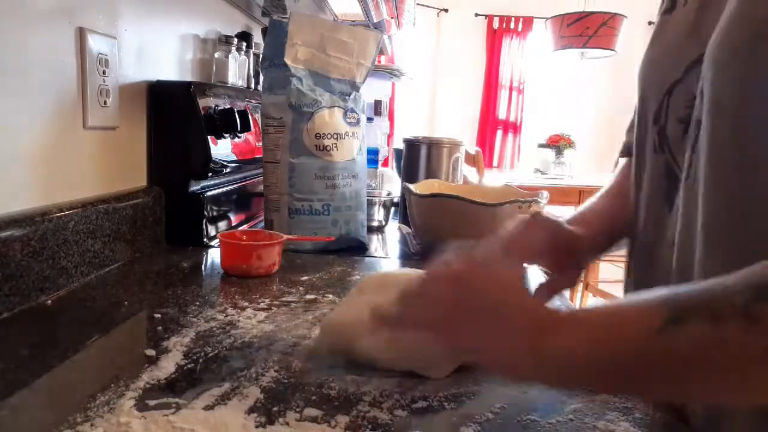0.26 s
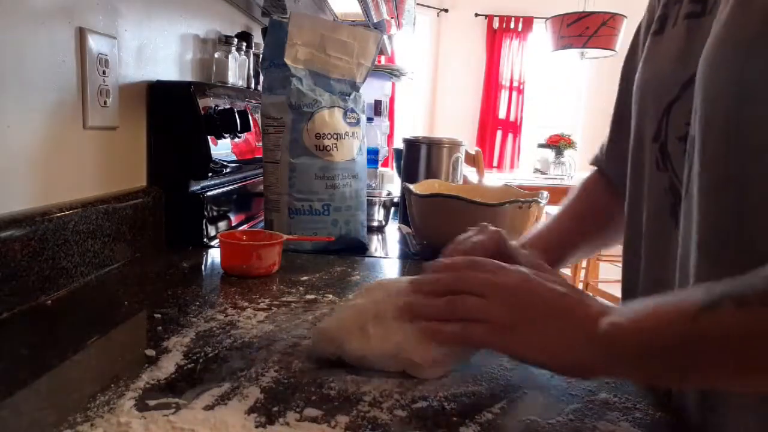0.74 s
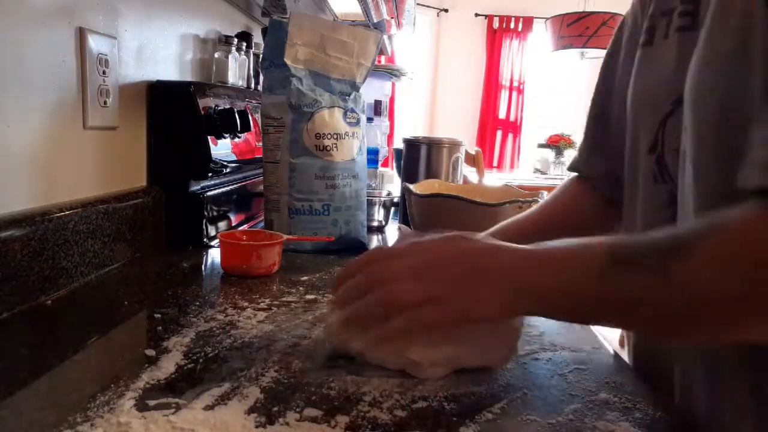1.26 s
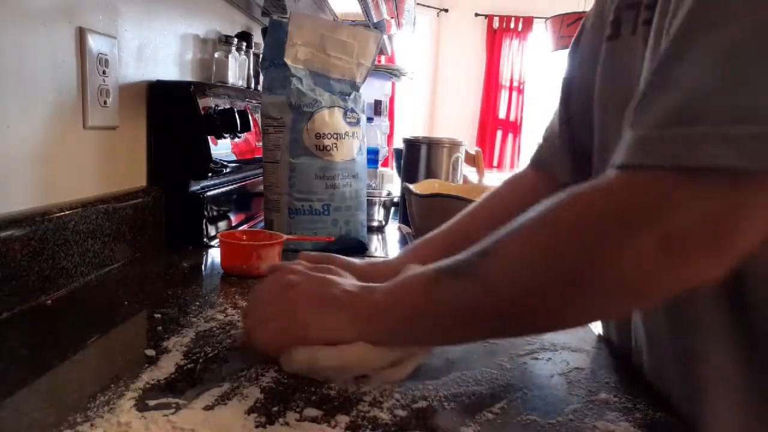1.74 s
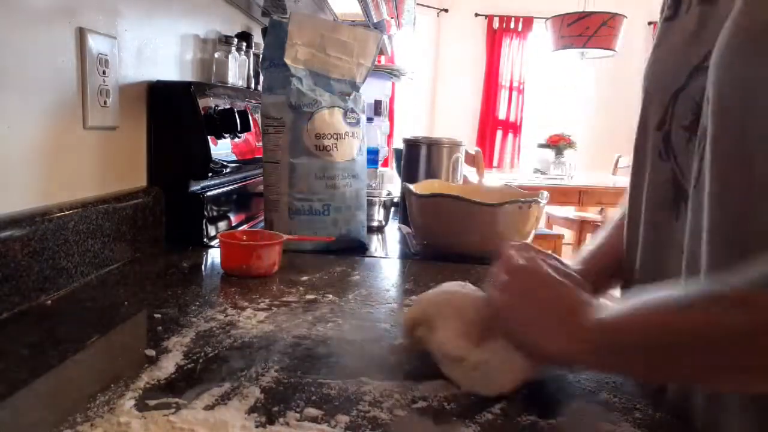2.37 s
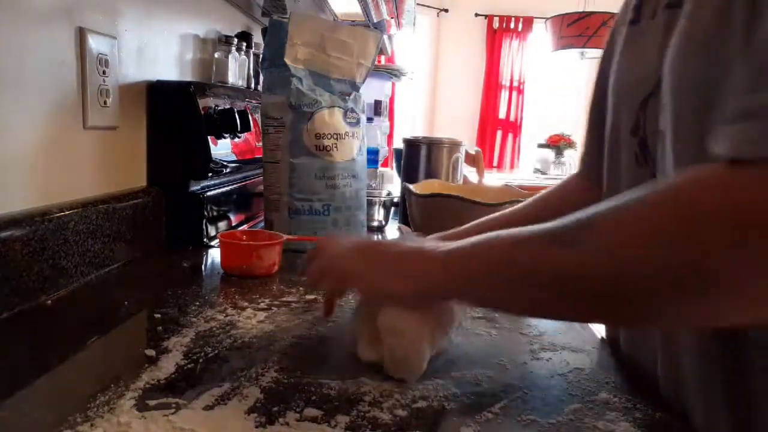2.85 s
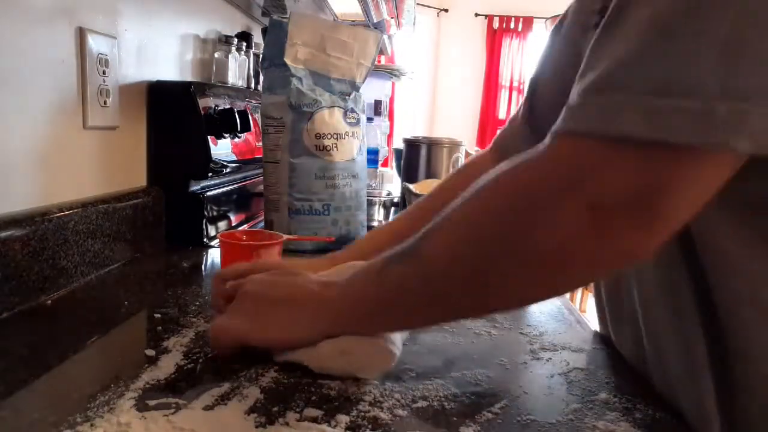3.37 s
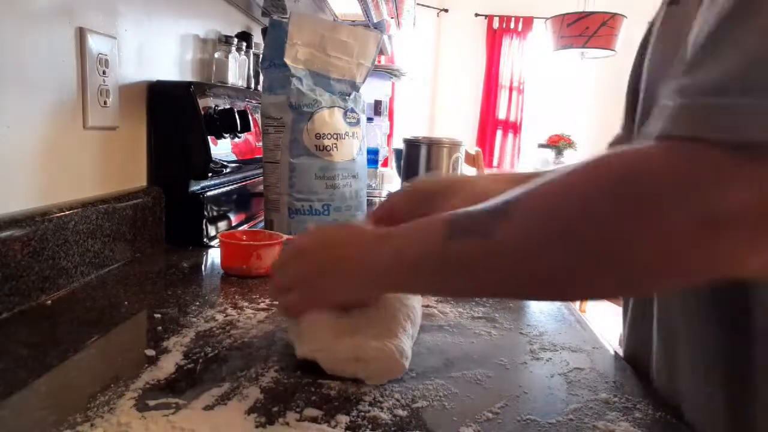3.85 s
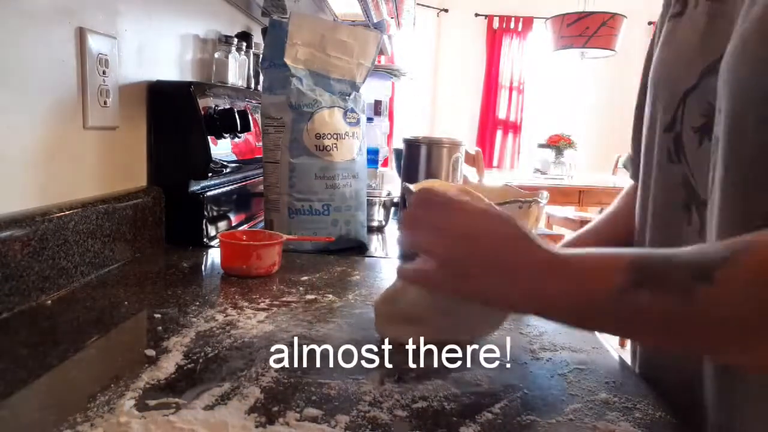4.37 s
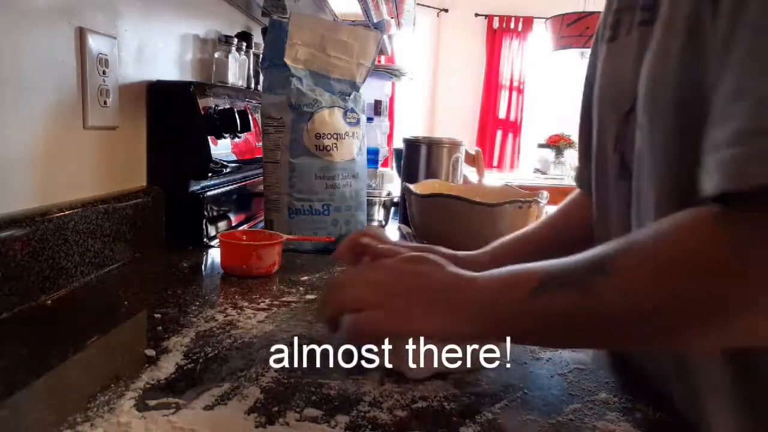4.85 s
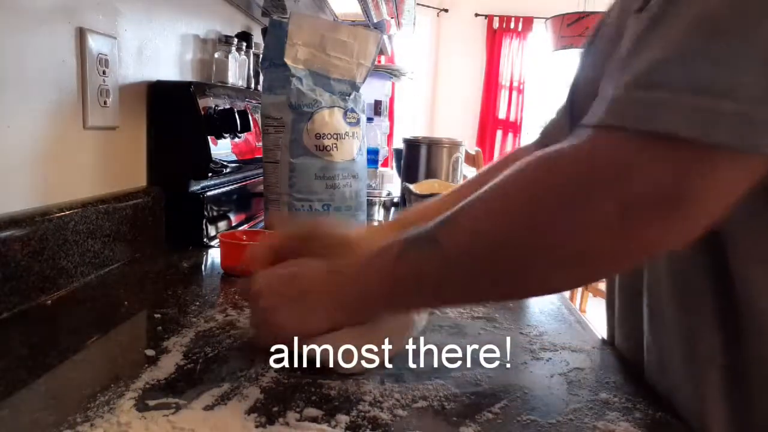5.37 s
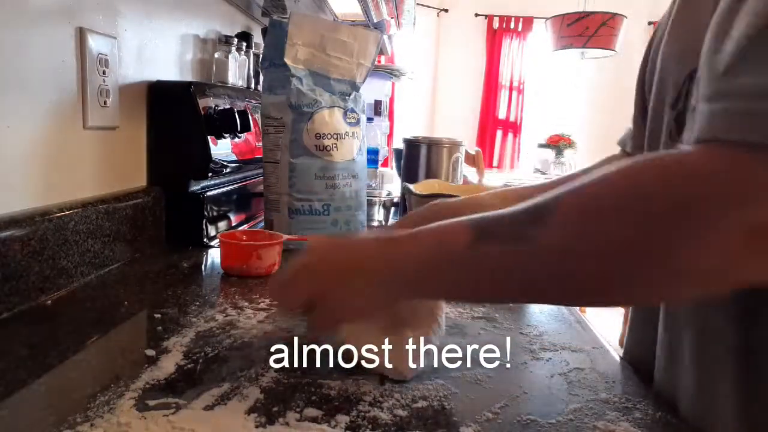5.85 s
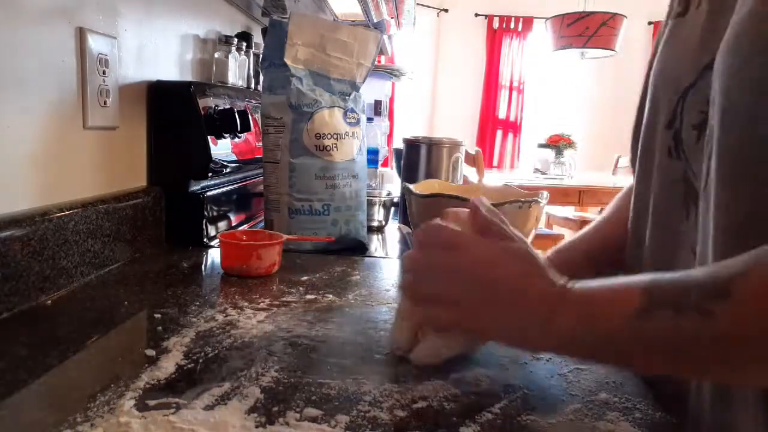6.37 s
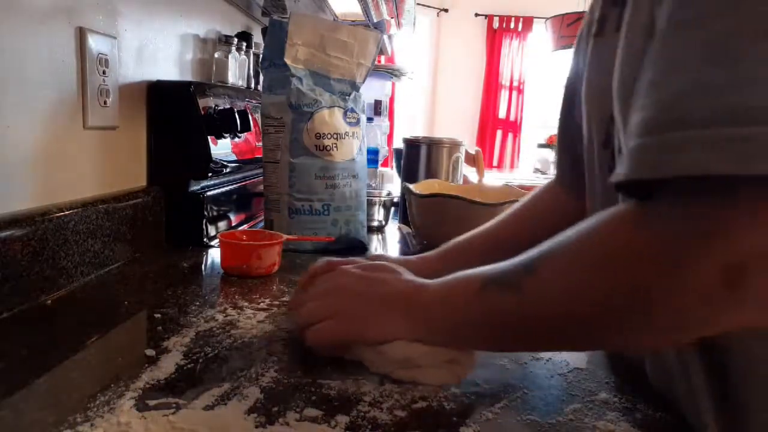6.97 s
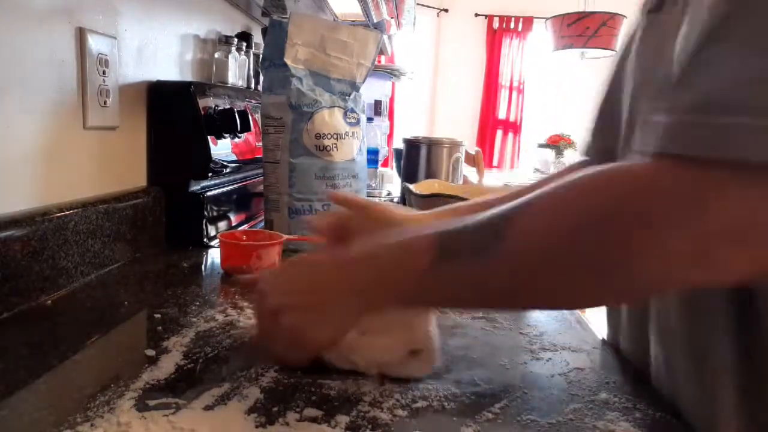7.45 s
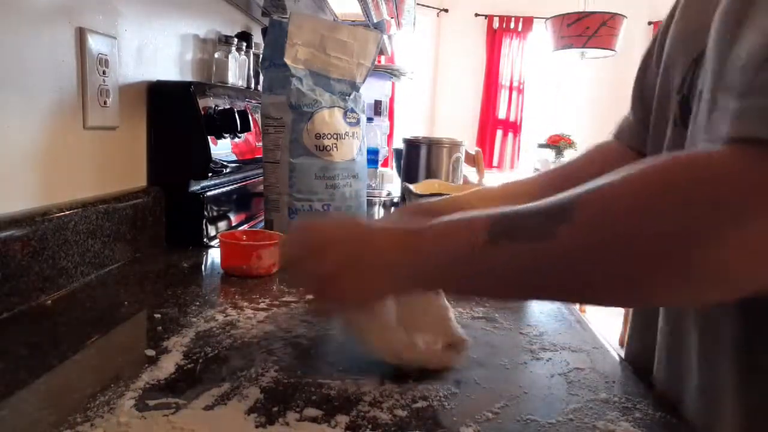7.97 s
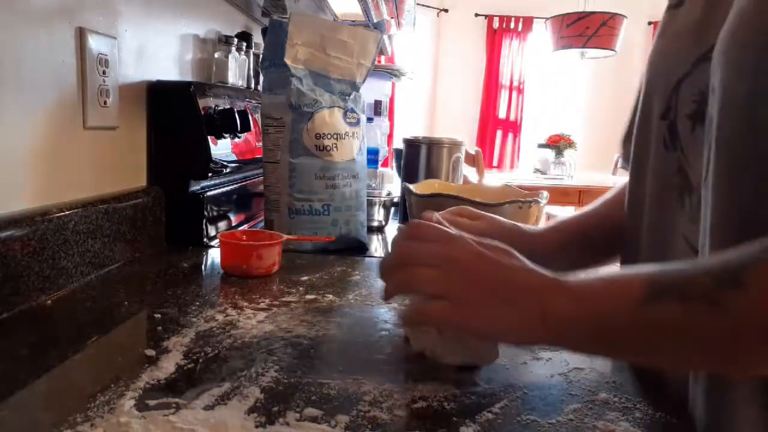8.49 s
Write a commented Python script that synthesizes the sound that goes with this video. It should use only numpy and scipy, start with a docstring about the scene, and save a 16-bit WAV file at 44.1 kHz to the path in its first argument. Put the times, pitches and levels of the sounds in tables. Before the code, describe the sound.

In a small quiet kitchen with low appliance hum, a close stereo microphone catches dough dropped hard on a counter, then pressed and folded. Dull low thuds alternate with faint flour hiss and hollow scuffs. A slappy drop comes about a third through, a brief dry rustle with bright ringing past the middle, and one firm thump close to the end.

```python
"""Floury hands and dough hiss over a stone counter, close to a stereo microphone, in a quiet humming kitchen.
Dough drops hard in the first second; pushes, scuffs and sticky drags follow, with another drop near 2.9 s,
where a faint whine is already up. Folding goes on in softer thuds, something rustles and rings nearby around
5 s, and one last hard drop comes near 8.3 s. Thuds are low decaying sines that shake the modes of the counter;
knocks, narrow bands, brushing and rustling are filtered noise; the hum and the whine are wavering sines."""
import sys
import numpy as np
from scipy import signal
from scipy.fft import rfft, irfft
from scipy.io import wavfile
from scipy.ndimage import uniform_filter1d, map_coordinates

SR = 44100
rng = np.random.default_rng(int(sys.argv[2]) if len(sys.argv) > 2 else 0)


def output_pcm(signal):
    """Save a mono or channel-first signal as 16-bit PCM at the path in sys.argv[1].

    Samples are clipped to [-1, 1] before scaling.
    """
    pcm = np.clip(np.atleast_2d(signal).T, -1, 1) * 32767
    wavfile.write(sys.argv[1], SR, np.round(pcm).astype(np.int16))


def voltage_ratio(decibels):
    """Convert decibels (scalar or array-like) to amplitude ratios, 20 dB per decade."""
    exponent = np.asarray(decibels, float) / 20
    return 10 ** exponent


N = 384552
T = np.arange(N) / SR  # seconds
F = np.maximum(np.fft.rfftfreq(N, 1 / SR), 1)  # Hz


def unit(x):
    """Scales to an rms of 1."""
    return x / np.sqrt(np.mean(x ** 2))


def along(table):
    """Reads a (Hz, value) table at every frequency, on a log axis."""
    hz, value = np.transpose(table)
    return np.interp(np.log(F), np.log(hz), value)


def shape(x, gain):
    """Filters by a gain at every frequency."""
    return irfft(rfft(x, N) * gain, N)


def peak(hz, width):
    """Response of one resonance, gain 1 at the centre."""
    return 1 / (1 + 1j * (F / hz - hz / F) * hz / width)


def ring(x, hz, width):
    """Sends x through one resonance, gain 1 at the centre."""
    return signal.lfilter(*signal.iirpeak(hz, hz / width, SR), x)


def narrow(x, hz, width):
    """Applies a resonance twice, for steeper sides."""
    return ring(ring(x, hz, width), hz, width)


def columns(rows):
    """Reads curve rows at every sample; the level is silent outside them."""
    s, db, *more = np.transpose(rows)
    level = np.interp(T, s, db, -150, -150)
    return [level] + [np.interp(T, s, column) for column in more]


def walk(rate):
    """Random values held for 1 / rate seconds and smoothed twice into a slow drift."""
    hold = int(SR / rate)
    steps = np.repeat(rng.standard_normal(N // hold + 1), hold)
    return 0.93 * uniform_filter1d(uniform_filter1d(steps, hold), hold)[:N]


def pair():
    """Two noises, alike in the bass and unrelated in the treble, as spaced microphones hear a diffuse field."""
    # Each row: frequency in Hz, correlation of left and right from -1 to 1
    likeness = [(60, 1), (130, 0.92), (290, 0.91), (640, 0.27), (1410, -0.12), (3100, 0)]
    alike = np.clip(along(likeness), -.9, .995)
    mid, side = rng.standard_normal((2, N))
    mid = shape(mid, np.sqrt((1 + alike) / 2))
    side = shape(side, np.sqrt((1 - alike) / 2))
    return np.array([mid + side, mid - side])


def grit(rough_db, rate):
    """Stereo noise whose level stumbles from grain to grain."""
    return unit(pair() * voltage_ratio(rough_db * walk(rate)))


def add(out, s, x):
    """Mixes x into out from s seconds on."""
    i = int(s * SR)
    out[..., i:i + x.shape[-1]] += x[..., :N - i]


def piece(noise, s):
    """One second of the noise from s on."""
    return noise[:, int(s * SR):int(s * SR) + SR]


def swell(length):
    """A quick rise, a hold and a fall over about this many seconds."""
    u = T[:SR] / length
    return (1 - np.exp(-u * 10)) / (1 + u ** 5)


def burst(noise, length):
    """A swell of this noise, its loudest part near 0 dB."""
    loudest = abs(noise[:, :int(length * SR)]).max()
    return swell(length)[:noise.shape[1]] * noise / loudest


def thuds():
    """Each soft blow gives a few low cycles, shakes the counter modes and opens with a noise slap and a smack."""
    # Dough landing. Each row: start in seconds, blow level in dB, ring in Hz,
    # slap level in dB relative to the blow, 60 dB decay of the blow in seconds
    landings = [(0.663, -25.5, 125, -9, 0.1), (0.68, -19, 140, -14, 0.03), (0.693, -18, 101, -21, 0.074),
                (0.728, -29.5, 109, -9, 0.079), (1.013, -42, 125, -25, 0.04), (1.918, -43, 111, -16, 0.06),
                (2.342, -46, 130, -20, .08), (2.454, -46, 119, -12, 0.13), (2.848, -24, 140, -3.5, 0.08),
                (2.8545, -24, 135, -25, .045), (2.887, -29, 105, -23, 0.068), (2.906, -33, 125, -20, .05),
                (2.922, -33, 150, -22, 0.08), (3.971, -39, 140, -20, .04), (3.983, -38, 105, -10, 0.1),
                (4.025, -41, 91.5, -4, 0.054), (4.229, -40, 175, -7.5, 0.058),
                (4.262, -32, 130, -19, 0.074), (4.287, -26, 124, -24, 0.045),
                (4.393, -41.5, 120, -14.5, 0.078), (4.505, -36.5, 118, -19, 0.051),
                (4.764, -43, 73, -19, 0.098), (5.1, -46, 112, 0, 0.13), (5.232, -42.5, 131, 0, 0.056),
                (5.501, -34, 145, -8, 0.045), (5.91, -36.5, 80.5, -17, 0.061), (5.949, -43, 133, -8, 0.094),
                (6.173, -37.5, 154, -12, 0.041), (6.216, -34.5, 120, -10, 0.072),
                (6.244, -31, 135, -18, 0.05), (6.262, -35, 150, -18, .05), (6.299, -41, 104, -9, 0.057),
                (6.791, -32, 117, -11, 0.07), (7.465, -44, 143, -17, 0.09), (7.684, -42.5, 114, -15, 0.074),
                (7.916, -39.5, 105, -18, 0.077), (7.947, -39, 84.5, -11, 0.052),
                (8.248, -31, 125, -18, 0.06), (8.303, -31.5, 130, -19, 0.08), (8.313, -36, 140, -4, .04),
                (8.317, -18, 104, -24, 0.062), (8.36, -31, 95, -22, 0.1)]
    # Modes of counter and cabinets. Each row: frequency in Hz, relative level in dB, 60 dB decay in seconds
    counter = [(69.2, 4.5, 0.55), (89, 6.5, 0.33), (153.8, -2, 0.13), (174, 3, 0.45), (304, 1, 1),
               (400, 10, 0.4)]
    # Colour of the slap noise. Each row: frequency in Hz, relative level in dB
    slap_colour = [(150, -47), (250, -8), (427, -12.5), (1650, -25), (2870, -39), (3470, -36), (6030, -50),
                   (8240, -51), (15600, -57)]
    # Resonances of the smack. Each row: frequency in Hz, width in Hz, relative level in dB
    slap_rings = [(670, 90, 1), (1050, 80, -8), (1270, 100, -1), (1630, 120, -5), (2370, 150, -14)]
    counter_db, smack_db, slap_t60_s = -20.5, -4, 0.042
    blows, slaps, smacks = np.zeros(N), np.zeros(N), np.zeros(N)
    t = T[:SR // 2]
    for s, db, hz, slap_db, t60 in landings:
        rise = 1 - np.exp(-(t * hz * 2.6) ** 2)  # dough spreads as it lands
        cycles = np.sin(2 * np.pi * hz * t) * voltage_ratio(-60 * t / t60)
        add(blows, s + 0.0022, -2 * voltage_ratio(db) * rise * cycles)
        contact_s = .0004 * voltage_ratio(-1.1 * (db + slap_db + 28))  # gentler slaps touch down more slowly
        touch = 1 - np.exp(-t / contact_s)
        add(slaps, s + 0.0032, voltage_ratio(db + slap_db) * touch * voltage_ratio(-60 * t / slap_t60_s))
        varied = rng.standard_normal((len(slap_rings), 2))  # pitch and level differ a little each time
        for (ring_hz, width_hz, ring_db), (pitch, level) in zip(slap_rings, varied):
            tone = np.sin(2 * np.pi * ring_hz * (1 + .025 * pitch) * t) * np.exp(-np.pi * width_hz * t)
            tone_db = db + slap_db + smack_db + ring_db + 2.0 * level
            add(smacks, s + 0.003, voltage_ratio(tone_db) * touch * tone)
    modes = sum(voltage_ratio(db) * peak(hz, np.log(1000) / np.pi / t60) * t60 * hz / 10 for hz, db, t60 in counter)
    shaken = voltage_ratio(counter_db) * shape(blows, modes)
    slap_noise = unit(shape(pair(), voltage_ratio(along(slap_colour))))
    return blows + shaken + smacks + voltage_ratio(-3) * slaps * slap_noise


def knocks():
    """Knuckles and dough edges scuff: a swell of noise through a hollow note and a fixed brighter band."""
    # Each row: start in seconds, peak of the hollow part in dB, hollow note in Hz,
    # bright part in dB relative to the hollow one, length in seconds
    scuffs = [(0.672, -36, 640, -14, .032), (1.172, -40, 350, -2, 0.045), (1.363, -45, 380, -1.5, 0.041),
              (2.085, -46, 395, -4, 0.065), (2.367, -41, 450, -8, 0.01), (2.382, -37, 470, -9, 0.02),
              (3.013, -35, 400, -6, 0.024), (3.05, -41, 396, -18, 0.045), (3.627, -51.5, 500, -5, 0.035),
              (4.227, -42.5, 330, -6, 0.022), (4.262, -45.5, 390, -7, .04), (5.084, -43, 385, -7, 0.047),
              (5.3, -47, 410, -10, 0.041), (6.175, -42.5, 400, -5, 0.023), (6.221, -47, 400, -5.5, 0.063)]
    out = np.zeros((2, N))
    bright = shape(pair(), peak(770, 340) ** 2 + voltage_ratio(-8) * peak(1100, 800) ** 4)
    noise = pair()
    for s, db, hz, bright_db, length in scuffs:
        hollow = burst(narrow(piece(noise, s), hz, 187), length)
        edge = voltage_ratio(bright_db) * burst(piece(bright, s), length)
        add(out, s, voltage_ratio(db) * (hollow + edge))
    return out


def narrow_bands():
    """Narrow bands of rough noise: sticky squeaks, ticks, longer drags, and ringing bursts within the rustle."""
    # Each row: start in seconds, peak in dB, centre in Hz, length in seconds
    bands = [(1.01, -68, 2250, .04), (1.995, -61.5, 1600, 0.37), (2.0, -64.5, 5300, 0.37),
             (3.13, -64, 1450, .04), (3.98, -64, 2200, .03), (4.051, -49, 1450, .006),
             (4.063, -49, 1400, .012), (4.258, -60, 1450, .02), (4.839, -59, 2230, 0.072),
             (4.857, -58.5, 1760, 0.06), (5.062, -39.5, 2240, .035), (5.194, -44, 2400, .035),
             (5.39, -56.5, 1300, 0.21), (5.92, -68, 2350, .16), (6.18, -66, 2300, .04),
             (7.179, -66, 2280, 0.036), (7.183, -63, 3170, 0.027), (7.62, -66, 2150, 0.1),
             (7.757, -62.5, 1490, 0.45), (7.915, -59.5, 4350, 0.064), (8.314, -62, 3930, .06)]
    width = .12  # share of the centre frequency
    out, noise = np.zeros((2, N)), grit(2.5, 200.)
    for s, db, hz, length in bands:
        band = narrow(piece(noise, s), hz, width * hz)
        add(out, s, voltage_ratio(db) * burst(band, length))
    return out


def brush():
    """Flour hisses and crackles under each stroke, its colour shifting a little; a duller scrape goes with it."""
    # Strokes of skin and dough over flour. Each row: loudest moment in seconds, hiss level in dB,
    # seconds to rise 20 dB, seconds to fall 20 dB, scrape in dB relative to the hiss
    strokes = [(0.056, -74, .9, .25, 4), (0.268, -74.5, .2, .25, 0), (0.685, -64.5, .02, .13, 12),
               (0.77, -74, .2, .06, -8), (1.045, -71.5, .08, .09, 3), (1.19, -80, .06, .12, 13),
               (1.4, -83, .45, .3, 11), (1.96, -74, .09, .6, 2.5), (2.09, -68, .3, .45, 5.5),
               (2.33, -70, .3, .22, 6.5), (2.53, -67, .25, .045, 0), (2.65, -80, .2, .07, 4),
               (2.854, -60.5, .004, .05, 22), (2.93, -68.5, .15, .22, 0), (3.115, -66, .03, .2, -4),
               (3.175, -66, .2, .03, -4), (3.232, -63.5, .02, .03, -2.5), (3.292, -67, .15, .06, -6),
               (3.88, -84, .2, .3, 6), (4.058, -65.5, .17, .06, 6), (4.29, -72, .05, .13, 7),
               (4.57, -65, .25, .06, -5), (4.72, -76, .15, .6, 1.5), (4.92, -75, .3, .05, 0),
               (5.5, -80, .11, .9, 14), (5.76, -74, .45, .22, 0), (5.93, -68, .07, .22, 4),
               (6.075, -70.5, .45, .03, 1.5), (6.22, -78, .02, .15, 9), (6.31, -63, .11, .09, -3),
               (6.49, -75, .4, .3, 4), (6.75, -76, .15, .06, -3), (6.81, -73, .05, .15, 4),
               (7.05, -79.5, .4, .4, 3), (7.2, -70.5, .12, .09, -8), (7.275, -67, .03, .06, -9),
               (7.65, -72, .09, .25, 5), (7.85, -77, .6, .11, 9), (7.918, -64.5, .008, .3, 0),
               (8.16, -68.5, .35, .17, 3), (8.325, -70, .02, .17, 9), (8.436, -64, .004, .17, -5),
               (8.58, -69.5, .25, .14, 4)]
    # Colour of the hiss. Each row: frequency in Hz, relative level in dB
    hiss_colour = [(1180, -43), (2000, -3), (2330, -1.5), (3440, -6), (5240, -2.5), (6120, -5.5),
                   (8490, -4), (15600, -10)]
    # about 400 clicks a second in each ear
    crackle = (rng.random((2, N)) < 400 / SR) * rng.standard_normal((2, N)) * voltage_ratio(12.)
    grains = (grit(2.0, 150.) + crackle) * voltage_ratio(2.0 * walk(35.))
    # overlapping bands from 2 kHz up, each drifting in level by itself
    bands = (np.exp(-(np.log2(F / hz) / .6) ** 2) for hz in 2000 * 2 ** np.arange(0, 3.1, .6))
    patches = sum(voltage_ratio(2.5 * walk(10.)) * shape(grains, band) for band in bands)
    hiss = unit(shape(patches, voltage_ratio(along(hiss_colour)) * abs(1 + .7 * peak(8500, 700))))
    scrape = unit(shape(grit(3.2, 60.), peak(1060, 840) ** 2))
    hiss_power, scrape_power = 0, 0
    t = T[::16]  # coarse time is enough for the envelopes
    for s, db, rise_s, fall_s, scrape_db in strokes:
        power = voltage_ratio(db - 20 * np.maximum((s - t) / rise_s, (t - s) / fall_s)) ** 2
        hiss_power = hiss_power + power
        scrape_power = scrape_power + power * voltage_ratio(scrape_db) ** 2
    hiss_level = np.interp(T, t, np.sqrt(hiss_power))
    scrape_level = np.interp(T, t, np.sqrt(scrape_power))
    return hiss_level * hiss + scrape_level * scrape


def rustle():
    """Two dry strokes, each with flickering narrow resonances; the top fades first, the low part comes late."""
    # One curve per stroke. Each row: time in seconds, level in dB, low part and top part in relative dB
    stroke_curves = [
        [(4.938, -62, -11, 4), (4.946, -48, -13, -1), (4.984, -44.5, -9.5, -3.5), (5.058, -47.5, -10, -2),
         (5.066, -44, -9, -7.5), (5.12, -49, -6, -6), (5.19, -54, -5.5, -12)],
        [(5.192, -56, -28, -12), (5.198, -45, -6.5, -19), (5.249, -49, 0, -11.5), (5.365, -62.5, 0, -6.5),
         (5.483, -80, 13, -12), (5.5, -77, 15, -17)],
    ]
    # One list per stroke. Each row: resonance in Hz, width in Hz, relative level in dB
    stroke_rings = [
        [(1770, 60, 3), (2240, 30, -1), (2720, 120, -5), (3010, 48, -9), (3460, 48, -5.5), (3920, 30, -1),
         (4420, 46, -8), (5420, 35, -3), (5880, 64, -8), (6440, 69, -7), (8130, 65, -2), (8800, 63, -9),
         (9730, 42, -11), (11340, 61, -3), (15300, 82, -10)],
        [(2700, 55, -7), (5420, 23, -5)],
    ]
    # Colour of the noise. Each row: frequency in Hz, relative level in dB
    noise_colour = [(760, -44), (1300, -11), (2120, -8), (2280, -2), (3180, -4.5), (8290, -10.5),
                    (10400, -11.5), (11400, -10.5), (15600, -22)]
    out = 0
    top = 1 / (1 + (6000 / F) ** 8)  # crosses over at 6 kHz
    low = unit(shape(grit(2.5, 40.), peak(1020, 1060) ** 2))
    for rows, rings in zip(stroke_curves, stroke_rings):
        db, low_db, top_db = columns(rows)
        noise = grit(2.2, 500.)
        body = shape(noise, voltage_ratio(along(noise_colour) - 4.5))
        sung = sum(voltage_ratio(ring_db + 4.0 * walk(30.)) * ring(noise, hz, width) for hz, width, ring_db in rings)
        drift = np.arange(N) + 6 * walk(12.)  # samples early or late: the resonances slide a little
        body = body + [map_coordinates(ear, [drift]) for ear in sung]
        middle, upper = (unit(shape(body, part)) for part in (1 - top, top))
        out = out + voltage_ratio(db) * (middle + voltage_ratio(top_db) * upper + voltage_ratio(low_db) * low)
    return out


def room(x):
    """A decaying diffuse tail, shorter in the treble and thin in the bass."""
    t60_s, top_t60_s = 0.3, 0.11
    tail = pair()
    bright = 1 / (1 + (1500 / F) ** 2)
    onset = 1 - np.exp(-T / 0.0054)
    dull_tail = shape(tail, 1 - bright) * voltage_ratio(-60 * T / t60_s)
    bright_tail = shape(tail, bright) * voltage_ratio(-60 * T / top_t60_s)
    tail = onset * (dull_tail + bright_tail)
    response = rfft(tail) / np.sqrt(np.sum(tail ** 2) / 2)
    return shape(x, response / (1 + 220 / (1j * F)) ** 2)  # thinned below 220 Hz


def kitchen():
    """Steady air and appliance noise, wavering hum bands and one thin whine."""
    # Colour of the air noise. Each row: frequency in Hz, relative level in dB
    air_colour = [(25, -40), (40, -15), (55, -9), (80, -8), (123, -2), (148, -7.5), (290, -10),
                  (323, -18.5), (401, -12), (617, -18), (1280, -32), (1500, -41), (2500, -48), (4500, -49),
                  (5600, -57), (7200, -58), (8500, -50.5), (10000, -54.5), (15600, -53.5)]
    # Unsteady appliance tones. Each row: frequency in Hz, scale of the pitch waver in Hz, level in dB
    hum_tones = [(57.7, 3, -61), (120.8, 4.08, -64), (1234, 22, -80.5)]
    # Loudness of the whine before its flutter. Each row: time in seconds, peak in dB
    whine_curve = [(0, -100), (.9, -90), (2.2, -96), (2.4, -82.5), (3.6, -84), (4.8, -86), (5.9, -91),
                   (6.2, -96), (8.72, -100)]
    air_db, whine_hz = -55, 1944
    air = voltage_ratio(air_db + 0.27 * walk(2.88)) * unit(shape(pair(), voltage_ratio(along(air_colour))))
    hum = 0
    for hz, waver_hz, db in hum_tones:
        phase = 2 * np.pi * np.cumsum(hz + waver_hz * walk(13.0)) / SR
        ears = np.array([[hz], [-hz]]) / 1100  # phase lead and lag in radians
        hum = hum + np.sqrt(2) * voltage_ratio(db + 1.9 * walk(11.0)) * np.sin(phase + ears)
    whine_level = voltage_ratio(np.interp(T, *np.transpose(whine_curve)) + 2.2 * walk(14.))
    whine_phase = 2 * np.pi * np.cumsum(whine_hz + 6 * walk(40.)) / SR
    whine = whine_level * np.sin(whine_phase + np.array([[.8], [-.8]]))
    return air + hum + whine


def scene():
    """Sums the work on the counter, its room and the kitchen, each frequency leaning left or right."""
    # Stereo lean. Each row: frequency in Hz, left minus right in dB
    left_db = [(60, 1.8), (500, 1.2), (1000, -1), (4000, -1), (12000, 1.2)]
    room_db = -8
    near = thuds() + knocks() + narrow_bands() + brush() + rustle()
    lean = voltage_ratio(np.array([[.5], [-.5]]) * along(left_db))
    return shape(near + voltage_ratio(room_db) * room(near) + kitchen(), lean)


def low_pass(x):
    """Removes everything above the highest recorded frequency."""
    return signal.sosfilt(signal.butter(12, 15780, fs=SR, output="sos"), x)


def record(dry):
    """The microphone drops the deepest bass, below about 45 Hz."""
    low_cut = signal.butter(4, 45, "high", fs=SR, output="sos")
    mix = signal.sosfilt(low_cut, dry)
    return low_pass(mix)


dry = scene()
out = record(dry)
output_pcm(out)
```